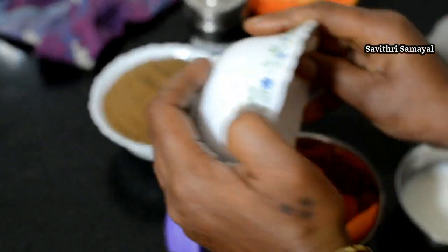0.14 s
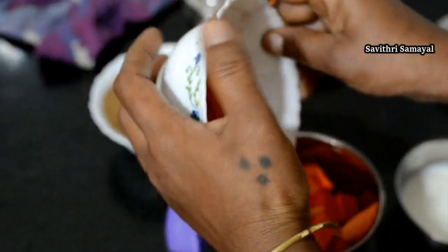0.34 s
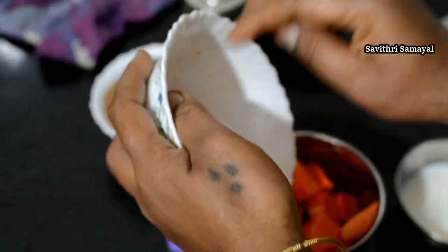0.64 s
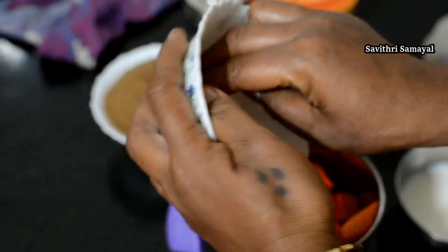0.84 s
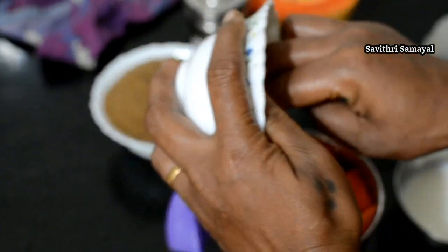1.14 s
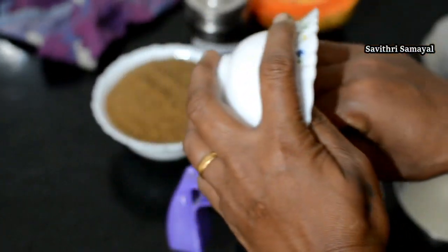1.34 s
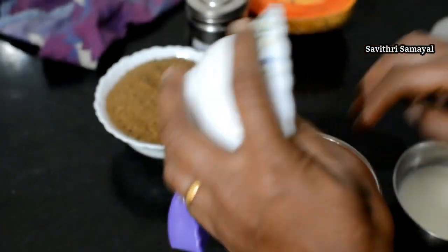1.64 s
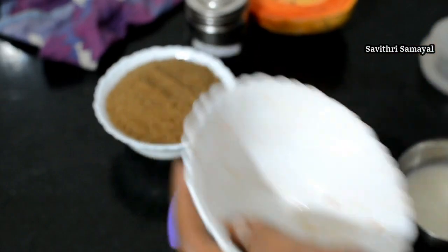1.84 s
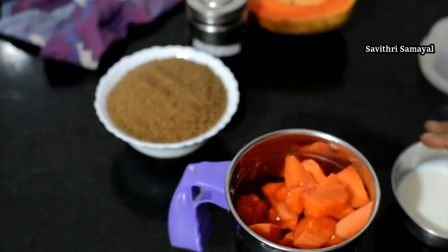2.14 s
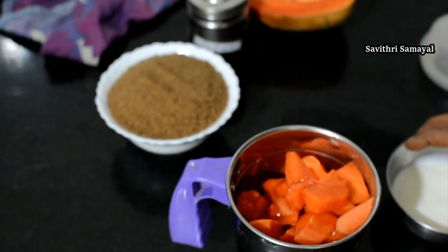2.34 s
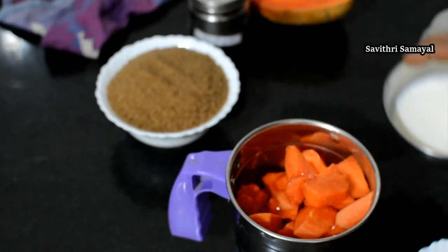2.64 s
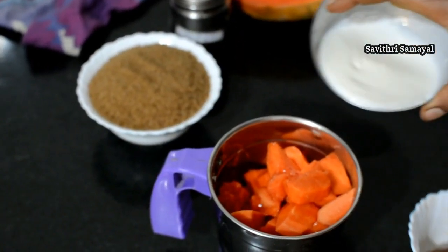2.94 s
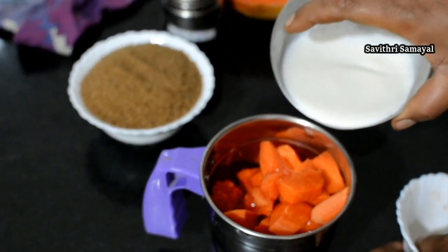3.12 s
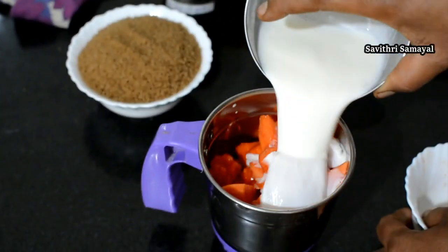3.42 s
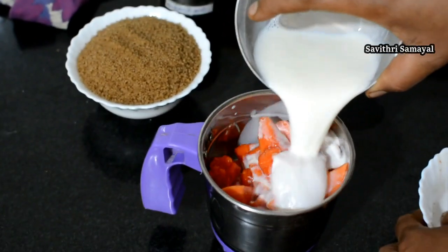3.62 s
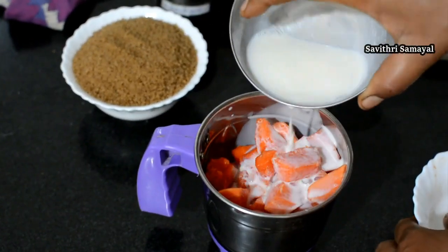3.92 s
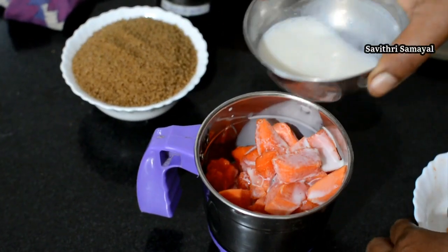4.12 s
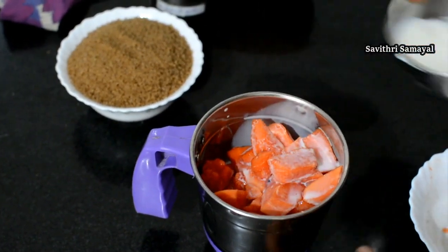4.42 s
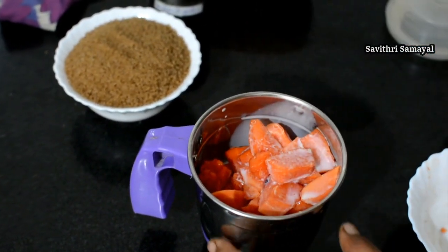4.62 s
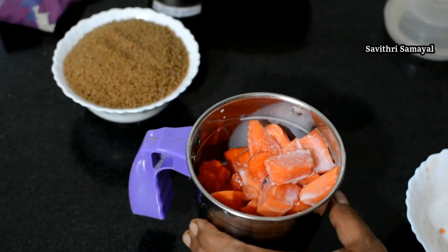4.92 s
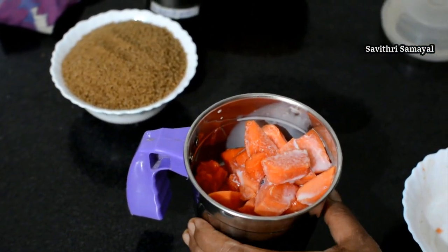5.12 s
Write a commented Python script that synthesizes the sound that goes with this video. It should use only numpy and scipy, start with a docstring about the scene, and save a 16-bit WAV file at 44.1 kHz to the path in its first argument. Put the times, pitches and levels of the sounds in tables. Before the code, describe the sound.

Over low room rumble, light taps and brushing lead to a hard china bowl clatter, a short milk pour, then a bright steel clank.

```python
"""A nail taps a bowl over a steady room rumble, skin or cloth brushes past and bangles tick. A china bowl then
bounces to rest on a kitchen counter, milk gurgles into a jar of fruit and a steel bowl is put down and rings.
Bowls are short contact pushes through resonances, with paired decaying sines for their rings; the other
sounds are filtered noise. Hard walls answer with a dense noise tail."""
import sys
import numpy as np
from scipy import signal
from scipy.fft import rfft, irfft
from scipy.io import wavfile
from scipy.ndimage import uniform_filter1d

SR = 44100
rng = np.random.default_rng(int(sys.argv[2]) if len(sys.argv) > 2 else 0)


def master(y):
    """Save y as 16-bit WAV."""
    cut = np.clip(np.atleast_2d(y).T, -1, 1)
    pcm = np.round(cut * 32767)  # scale
    wavfile.write(sys.argv[1], SR, pcm.astype(np.int16))


N = 232138


def undb(db):
    """Decibels to an amplitude factor."""
    return 10 ** (np.asarray(db) / 20)


def level(x, db):
    """Scales a sound to the given RMS level."""
    return x * undb(db) / np.sqrt(np.mean(x ** 2))


def band(x, hz, width):
    """Band-pass with skirts of 12 dB per octave."""
    edges = np.clip([hz - width / 2, hz + width / 2], 20, .45 * SR)
    return signal.sosfilt(signal.butter(2, edges, "band", fs=SR, output="sos"), x)


def fade(t60, seconds):
    """Exponential decay that falls 60 dB in t60 seconds."""
    return undb(-60 * np.arange(int(seconds * SR)) / SR / t60)


def add(track, s, sound, peak_db):
    """Mixes a sound in at s seconds with the given peak."""
    i = int(s * SR)
    track[i:i + len(sound)] += (sound * undb(peak_db) / np.abs(sound).max())[:N - i]


def clicks(events, width, t60):
    """A sharp contact and a brief fading grit in a broad resonance."""
    out = np.zeros(N)
    for s, db, hz in events:
        grit = rng.standard_normal(SR // 20) * fade(t60, .05)
        grit[0] = 4  # the contact itself
        add(out, s, band(grit, hz, width), db)
    return out


def bursts(events, breadth):
    """Noise that shakes one resonance and dies away, so it rings unsteadily."""
    out = np.zeros(N)
    rise = np.minimum(np.arange(SR // 2) / SR / 0.0041, 1) ** 2  # full after 4.1 ms
    for s, db, hz, t60 in events:
        shake = rng.standard_normal(SR // 2) * rise * fade(t60, .5)
        add(out, s, band(shake, hz, breadth * hz), db)
    return out


def ring(modes, tilt_db=0, twin=.9, waver_db=2):
    """Half a second of free modes, each a close pair in opposition that blooms and beats; tilt is per octave."""
    t = np.arange(SR // 2) / SR
    out = 0
    for hz, db, t60, split in modes:
        turn = hz * t + rng.random()
        lower = np.sin(2 * np.pi * (turn - split * t / 2))
        upper = np.sin(2 * np.pi * (turn + split * t / 2))
        # every mode wavers a little as it dies, in steps of 50 samples
        waver = level(uniform_filter1d(rng.standard_normal(len(t) // 50), size=12), 0).repeat(50)
        tilt = tilt_db * np.log2(hz / modes[0][0])  # relative to the first mode
        out = out + undb(db + waver_db * waver + tilt) * fade(t60, .5) * (lower - twin * upper)
    return out


def thud(hz):
    """A short contact push through the resonances of slab and cupboard, once more off the splash-back."""
    push = np.zeros(SR // 10)
    size = int(SR / hz / 2)  # half a period
    push[:size] = np.hanning(size)
    body = band(band(push, hz, 1.027 * hz), hz, 1.725 * hz)
    upper = undb(-6.5) * band(push, 1.264 * hz, 0.28 * hz)
    low = undb(-20.5) * band(push, 360, 430)
    first = body + upper + low
    echo_s, echo_db = 0.00221 * rng.uniform(.8, 1.2), -7
    return first + undb(echo_db) * np.roll(first, int(echo_s * SR))


def rumble():
    """Far traffic and appliances with hiss, as coloured noise that swells slightly; two narrow noise hums waver."""
    # Spectrum of the room bed. Each row: frequency in Hz, relative density in dB per Hz.
    colour_points = [(13, -33), (22, -11), (58, -5), (122, -11.5), (165, -4.5), (256, -1.5), (286, 0.5),
                     (310, 2.5), (432, 2.5), (539, -3), (1020, -6.5), (1970, -12.5), (3230, -22),
                     (11500, -31), (16000, -32)]
    # Wavering tones. Each row: pitch in Hz, width in Hz, RMS level in dB.
    hums = [(48.4, 5, -69), (162.4, 8.7, -62.5)]
    hz, db = np.transpose(colour_points)
    colour = undb(np.interp(np.log(np.fft.rfftfreq(N, 1 / SR) + 1), np.log(hz), db))
    bed = level(irfft(rfft(rng.standard_normal(N)) * colour, N), -48.5)
    swell = level(uniform_filter1d(uniform_filter1d(rng.standard_normal(N), 6000), 6000), 0)
    out = bed * undb(.5 * swell)  # 0.5 dB RMS of swell
    return out + sum(level(band(rng.standard_normal(N), f, w), d) for f, w, d in hums)


def side_noise():
    """A faint treble hiss and a fainter low rumble, opposite in the two channels."""
    treble = signal.butter(3, 3500, "high", fs=SR, output="sos")
    hiss = level(signal.sosfilt(treble, rng.standard_normal(N)), -71.5)
    return hiss + level(band(rng.standard_normal(N), 110, 170), -91.5)


def taps():
    """A fingernail excites two resonances of the bowl; odd taps and drops are single resonant clicks."""
    # Nail on the bowl. Each row: start in seconds, peak in dB before the resonance's own level.
    nail_hits = [(0.028, -33.5), (0.127, -36), (0.198, -41)]
    # Resonances under the nail. Each row: pitch in Hz, width in Hz, relative level in dB.
    nail_modes = [(2680, 530, -1), (3970, 660, -11.5)]
    # Small taps and drops. Each row: start in seconds, peak in dB, pitch in Hz.
    odd_taps = [(.919, -47.5, 4500), (.971, -45.5, 4670), (2.025, -39.5, 2580), (2.3255, -43.5, 5400),
                (3.219, -28, 7200), (3.473, -42, 4630), (3.517, -44, 5030), (3.544, -44, 4800),
                (3.668, -40, 3230), (3.775, -48, 6160), (3.878, -45, 4530), (3.89, -44.5, 3160),
                (3.9225, -35.5, 2700), (4.005, -40, 4300)]
    out = clicks(odd_taps, 1660, 0.022)
    for hz, width, rel_db in nail_modes:
        out += clicks([(s, db + rel_db, hz) for s, db in nail_hits], width, 0.0071)
    return out


def brush():
    """Skin or cloth brushes past: hiss around 10 kHz that comes and goes, with faint random ticks in it."""
    # Loudness curve of the brushing. Each row: time in seconds, level in dB.
    strokes = [(0.9, -64), (1.12, -72), (1.44, -70), (1.65, -63), (1.99, -73), (2.81, -72), (3.24, -65),
               (3.4, -65), (3.69, -64.5), (3.8, -75)]
    ticks_per_s, spread_db = 75, 3
    s, db = np.transpose(strokes)
    chance, size = rng.random((N, 2)).T
    ticks = (chance < ticks_per_s / SR) * undb(-spread_db * np.log(size + .08))
    ticks = signal.fftconvolve(ticks, rng.standard_normal(SR // 20) * fade(0.025, .05))[:N]
    hiss = rng.standard_normal(N) + 2 * ticks
    return level(band(hiss, 9700, 4900), 0) * undb(np.interp(np.arange(N) / SR, s, db, -120, -120))


def bangles():
    """Bangles and fingernails tick, and each tick leaves a tiny metal ring."""
    # Ticks. Each row: start in seconds, peak in dB, pitch in Hz.
    ticks = [(0.9367, -43, 10800), (1.037, -41, 10700), (1.1337, -42, 10700), (1.1636, -46, 9120),
             (1.2314, -40, 10400), (1.314, -41.5, 10600), (1.396, -39, 10540), (1.475, -45, 10700),
             (1.5663, -39.5, 10800), (1.725, -39.5, 10900), (1.7749, -45, 10700), (1.808, -47, 9000),
             (1.9055, -42, 10700), (2.5, -46, 8540), (2.7924, -44, 8650), (2.872, -42.5, 8600),
             (2.974, -45, 10500), (3.0061, -50, 9100), (3.0746, -43, 9350), (3.251, -47, 11500),
             (3.334, -47, 11000), (3.35, -48.5, 8700), (3.416, -38, 10300), (3.5048, -44, 10500),
             (3.5644, -38.5, 10100), (3.606, -44, 10500), (3.715, -40.5, 10700)]
    # Metal modes. Each row: pitch in Hz, relative level in dB, t60 in seconds, split of the pair in Hz.
    metal = [(9100, -3, .06, 30), (10700, 0, .07, 30)]
    out = clicks(ticks, 4500, 0.023)
    for s, db, _ in ticks:
        ring_db = -25 + 3 * rng.standard_normal()  # relative to the tick
        add(out, s, ring(metal), db + ring_db)
    return out


def scrapes():
    """Something slides a moment on the counter: dense uneven grit in a wide band, dying away."""
    # Slides. Each row: start in seconds, peak in dB, pitch in Hz, t60 in seconds.
    slides = [(2.244, -47.5, 9000, 0.14), (2.325, -36, 9100, 0.069), (2.334, -38.5, 8900, 0.3),
              (2.992, -45, 1730, 1), (3.217, -31.5, 8500, 0.19), (4.883, -38.5, 11900, 0.12)]
    out = np.zeros(N)
    for s, db, hz, t60 in slides:
        unevenness_db = 0.52 * rng.exponential(size=SR // 2)
        grit = rng.standard_normal(SR // 2) * undb(unevenness_db)
        add(out, s, band(grit * fade(t60, .5), hz, 1.3 * hz), db)
    return out


def bumps():
    """Dull bumps come through the counter as decaying noise in a low resonance."""
    # Bumps. Each row: start in seconds, peak in dB.
    knocks = [(2.659, -50), (3.099, -46), (3.961, -49), (4.17, -54)]
    hz, t60 = 60, 0.55
    return bursts([(s, db, hz, t60) for s, db in knocks], 0.63)


def china_bowl():
    """A tick on the rim, then bounces that each thud, crack, ring the rim and jingle what lies near."""
    # Blows on the counter. Each row: start in seconds, thud peak in dB, rim ring peak in dB.
    blows = [(3.0905, -3.7, -37), (3.1497, -7.5, -43), (3.183, -9, -43), (3.1995, -10, -46),
             (3.2112, -13, -50), (3.224, -21, -60), (3.2365, -16, -60), (4.0055, -17.5, -42),
             (4.0095, -24, -60)]
    # Rim modes. Each row: pitch in Hz, relative level in dB, t60 in seconds, split of the pair in Hz.
    rim = [(3050, 0, .17, 8), (5450, 0, .07, 12), (8000, -4, .06, 15), (11800, -5, .07, 20)]
    # Loose metal nearby, shaken by the blow. Each row: the same four columns as the rim modes.
    loose_metal = [(9356, 2, .16, 12), (12800, -7, .12, 45), (14150, -2, .13, 35)]
    # Something hard touches the rim: start in seconds, click peak in dB, ring peak in dB, tilt in dB per octave.
    rim_tick = (2.848, -45, -45, -.6)
    thuds, rings = np.zeros(N), np.zeros(N)
    cracks = []
    for s, db, ring_db in blows:
        add(thuds, s, thud(1942 + 15 * db), db)  # Hz; harder blows are shorter and so higher
        add(rings, s, ring(rim, tilt_db=-26), ring_db)  # the slab hardly stirs the upper rim modes
        add(rings, s, ring(loose_metal, waver_db=5), -37 + 1.8 * db)
        cracks.append((s, -27 + 1.9 * db, 8000))  # bright contact noise, growing fast with the blow
    rings += clicks(cracks, 11000, 0.036)
    s, db, ring_db, tilt_db = rim_tick
    add(rings, s, ring(rim, tilt_db, twin=0.24), ring_db)
    return thuds, rings + clicks([(s, db, 5200)], 6000, 0.013)


def milk():
    """Splashes shake the air pockets between the fruit, so each resonates briefly."""
    # Gurgles. Each row: start in seconds, peak in dB, pitch in Hz.
    gurgles = [(3.494, -38.5, 910), (3.55, -39, 980), (3.59, -36, 1030), (3.63, -45, 1000),
               (3.746, -37.5, 1086), (3.776, -41, 1070), (3.774, -35.5, 1440), (3.798, -39, 1040),
               (3.804, -47, 1490)]
    cycles = 55  # to die by 60 dB
    return bursts([(s, db, hz, cycles / hz) for s, db, hz in gurgles], 0.19)


def steel_bowl(count=30):
    """Set down with small rebounds; the first touch starts clear low modes under a dense shimmer."""
    # Blows on the counter. Each row: start in seconds, peak in dB, thud pitch in Hz.
    blows = [(4.7342, -20.5, 1400), (4.735, -8.5, 1326), (4.738, -22.5, 1190), (4.748, -22.5, 1150),
             (4.757, -23.5, 1230)]
    # Clear modes. Each row: pitch in Hz, relative level in dB, t60 in seconds, split of the pair in Hz.
    clear = [(718, -9, .3, 5), (1212, -5, .3, 5), (1880, -14, .3, 6), (2810, -18, .3, 5),
             (3331, 1, .4, 6.3), (4100, -27, .2, 20), (4732, -16, .28, 6), (4850, -20, .2, 12),
             (5222, 2, .2, 8), (5679, -19, .22, 6), (6627, -13, .28, 6), (6740, -10, .18, 14),
             (10990, -10, .18, 10), (11690, -12, .16, 10)]
    # Treble modes of the thin wall crowd into clusters.
    # Each row: centre in Hz, spread either way in Hz, middle relative level in dB, t60 in seconds.
    clusters = [(8820, 473, -25, 0.35), (10200, 390, -30, 0.24), (11000, 800, -24.5, 0.28),
                (12400, 840, -28, 0.3), (13400, 516, -26.5, 0.26), (15040, 750, -33, 0.23)]
    thuds, rings = np.zeros(N), np.zeros(N)
    shimmer = []
    for hz, spread, db, t60 in clusters:
        for u, v, w in rng.uniform(-1, 1, (count, 3)):
            shimmer.append((hz + spread * u, db + 6 * v, t60, 60 + 50 * w))
    for s, db, hz in blows:
        add(thuds, s, thud(hz), db)
    first_touch = blows[0][0]
    add(rings, first_touch, ring(clear + shimmer), -19)
    return thuds, rings


def walls(x):
    """Hard walls answer with a dense noise tail, its decay time set band by band."""
    # Bands of the tail. Each row: centre in Hz, noise level before the decay in dB, t60 in seconds.
    tail_bands = [(300, -38.5, 0.44), (480, -45.5, 0.42), (860, -48.5, 0.45), (1460, -43, 0.42),
                  (2720, -42.5, 0.24), (5860, -41.5, 0.18), (12000, -38, 0.29)]
    tail = 0
    for hz, db, t60 in tail_bands:
        tail = tail + level(band(rng.standard_normal(SR), hz, 0.83 * hz), db) * fade(t60, 1)
    build = np.minimum(np.arange(SR) / SR / 0.0007, 1)  # full after 0.7 ms
    return signal.fftconvolve(x, tail * build)[:N]


def scene():
    """Mixes the sources with their room tail; the channels differ only by the side noise."""
    thuds, rings = np.add(china_bowl(), steel_bowl())
    small = bangles() + taps() + milk() + scrapes()
    # thuds travel through the slab and fill the room; rings and small sounds are heard mostly direct
    wet = walls(thuds + undb(-6) * rings + undb(-6) * small)
    mid = thuds + rings + small + wet + bumps() + brush() + rumble()
    side = side_noise()
    return np.array([mid + side, mid - side])


def record(dry):
    """A steep low-pass cuts the top of the treble above 15.68 kHz."""
    return signal.sosfilt(signal.ellip(10, .2, 75, 15680, fs=SR, output="sos"), dry)


dry = scene()
out = record(dry)
master(out)
```